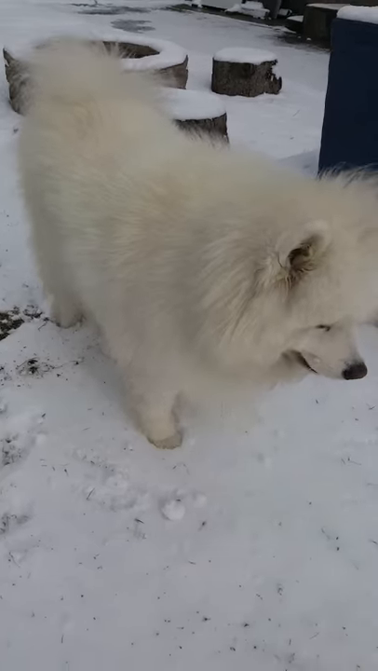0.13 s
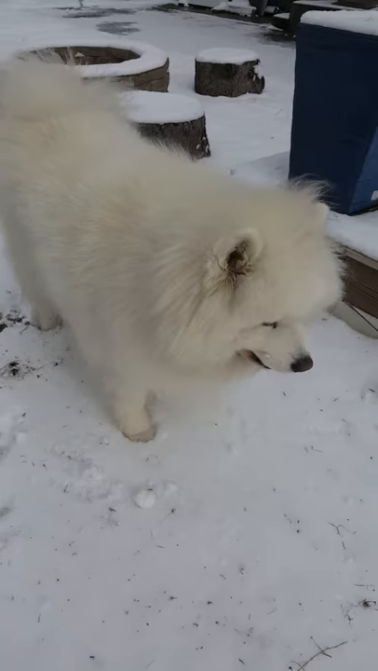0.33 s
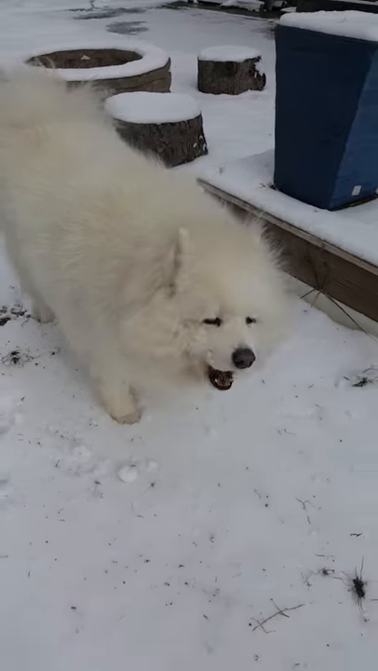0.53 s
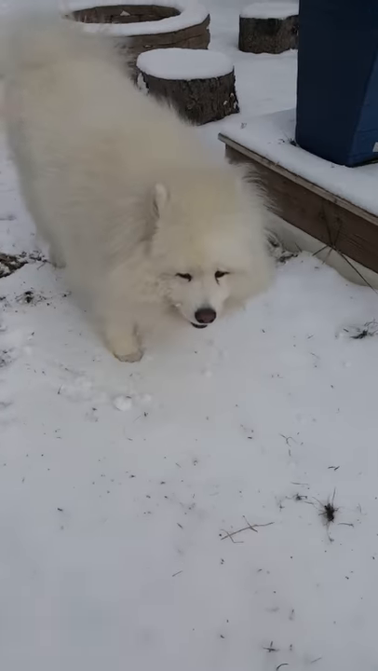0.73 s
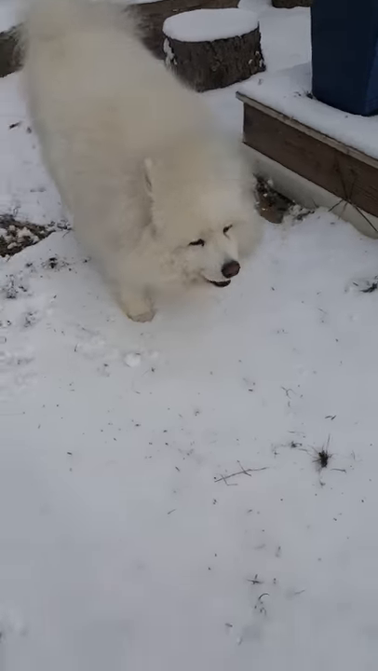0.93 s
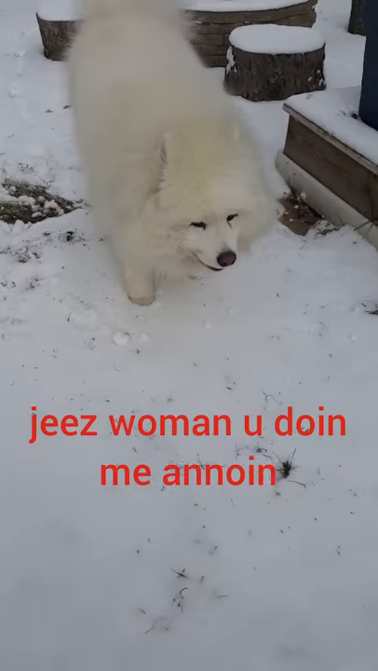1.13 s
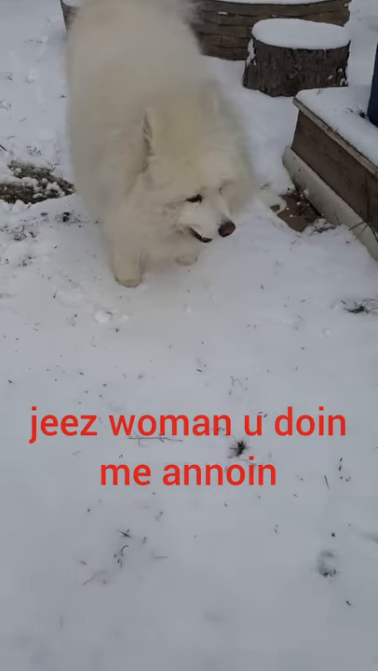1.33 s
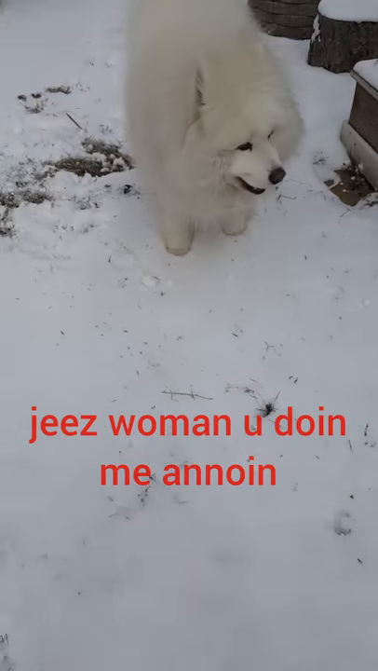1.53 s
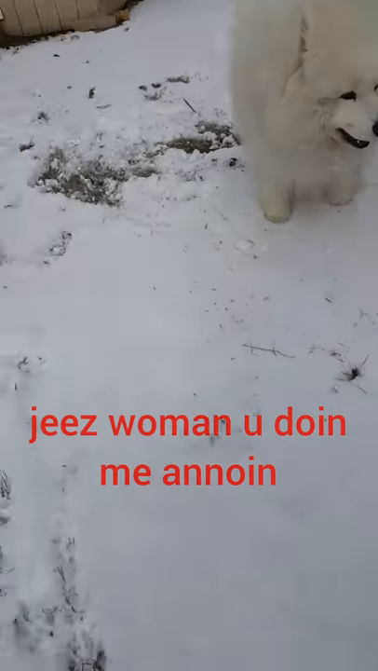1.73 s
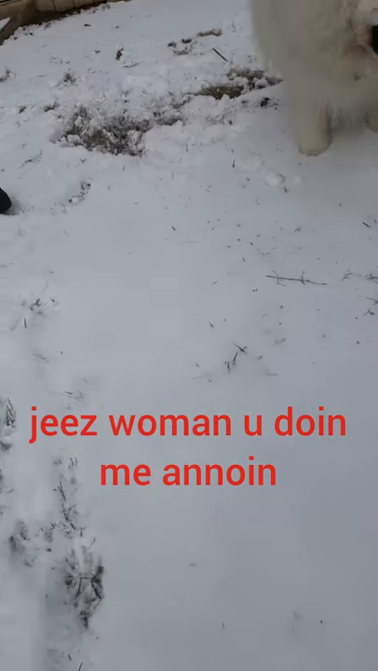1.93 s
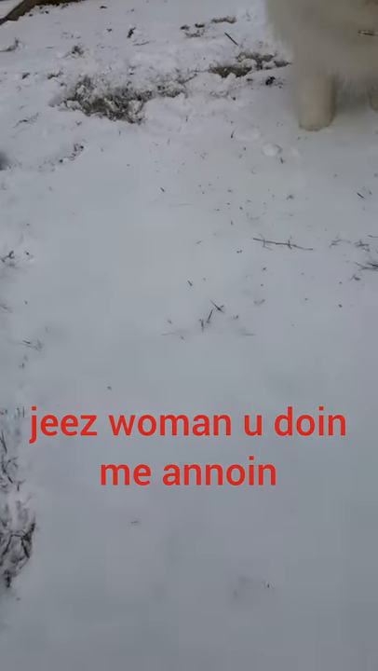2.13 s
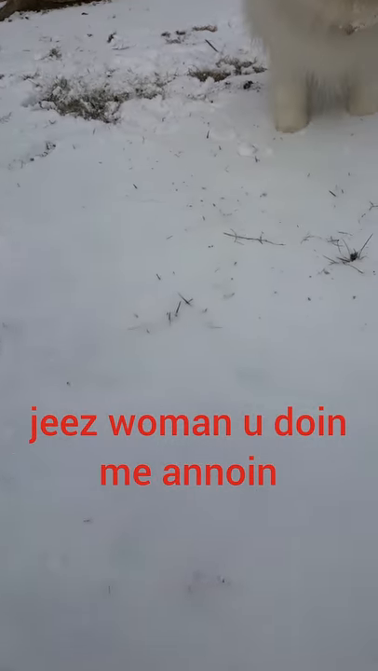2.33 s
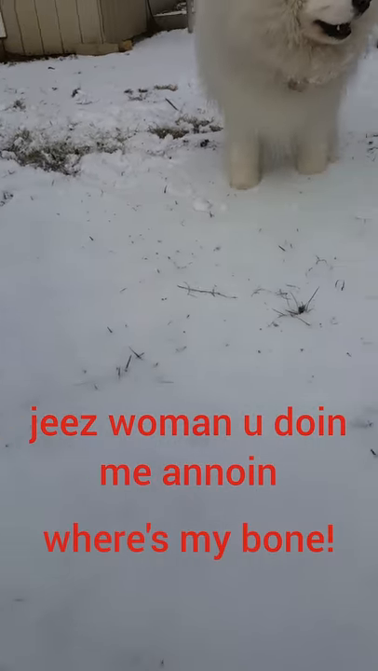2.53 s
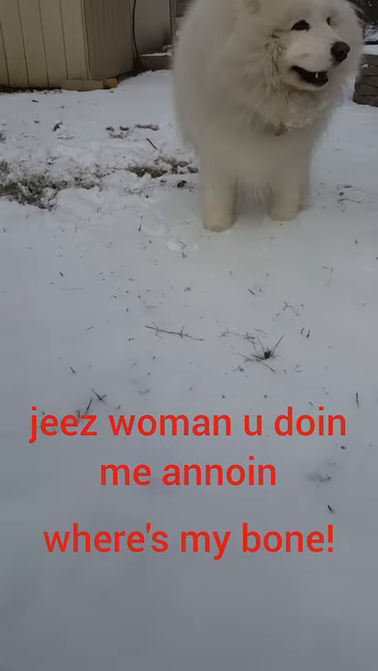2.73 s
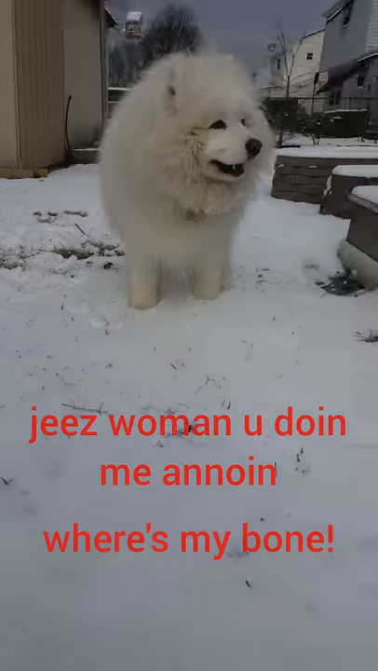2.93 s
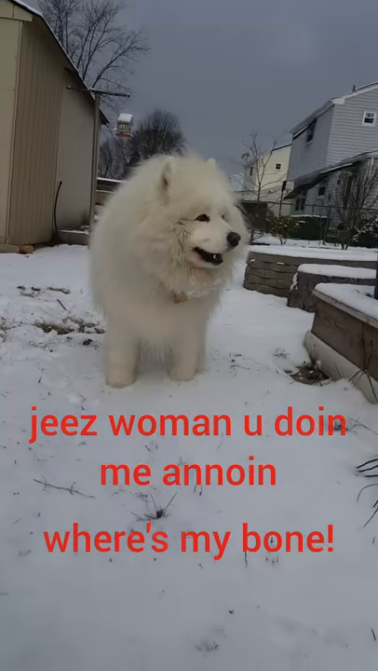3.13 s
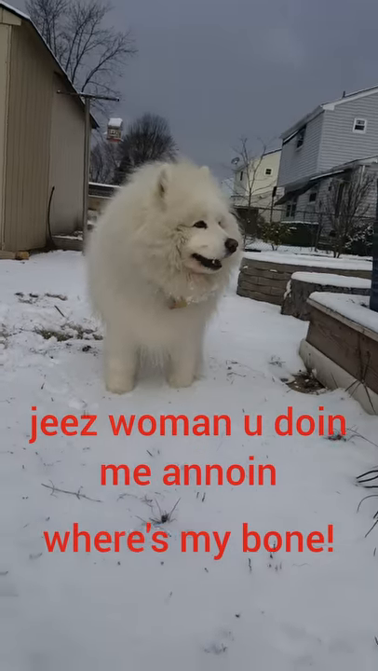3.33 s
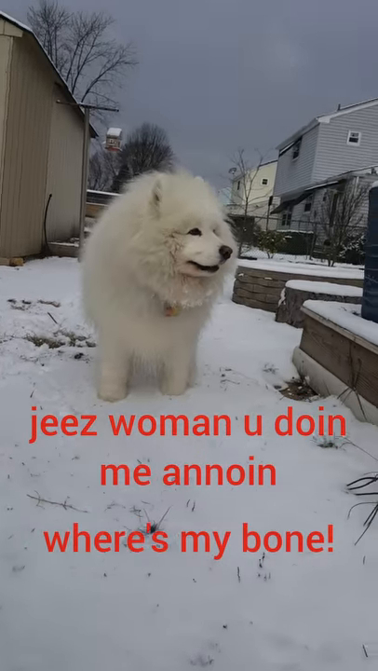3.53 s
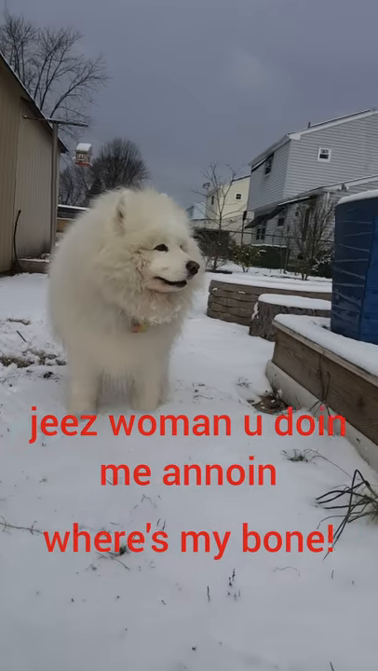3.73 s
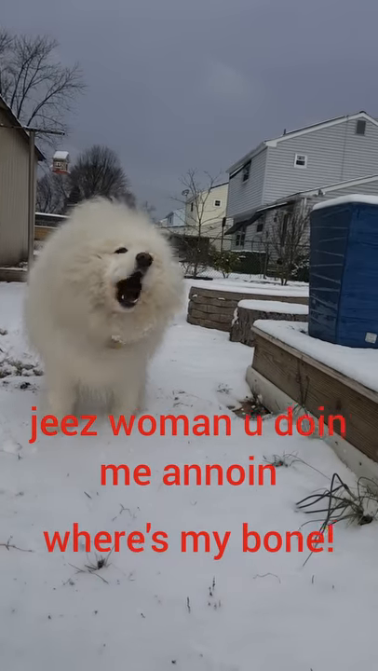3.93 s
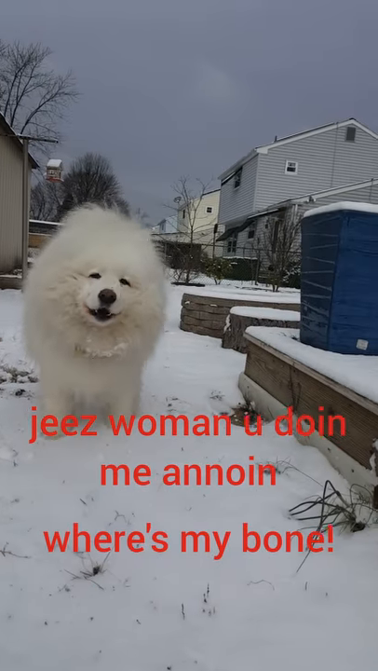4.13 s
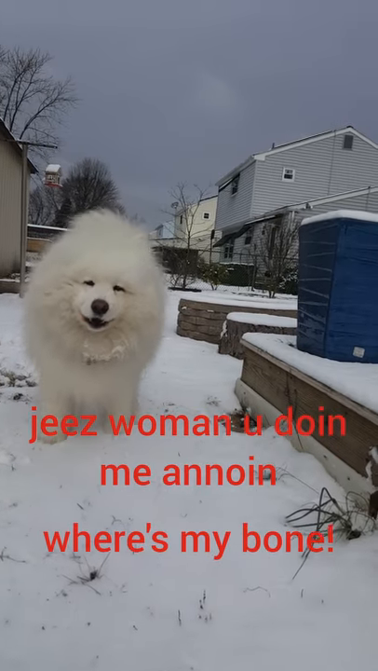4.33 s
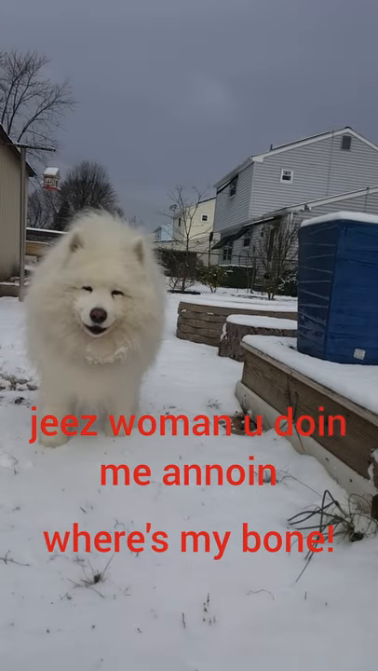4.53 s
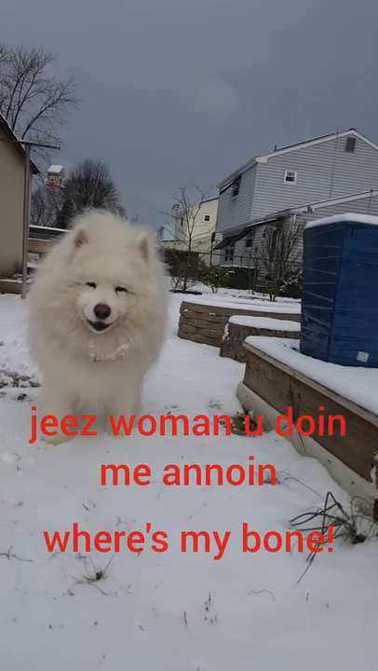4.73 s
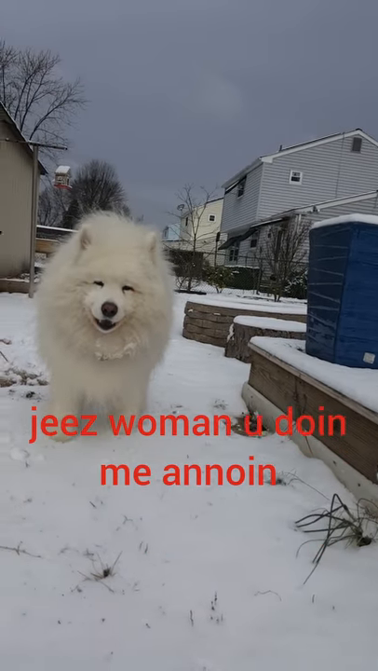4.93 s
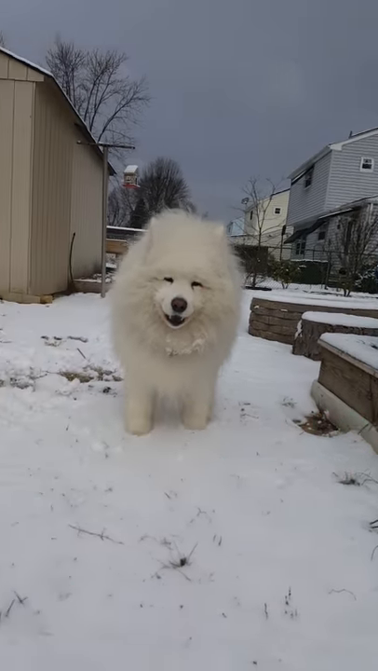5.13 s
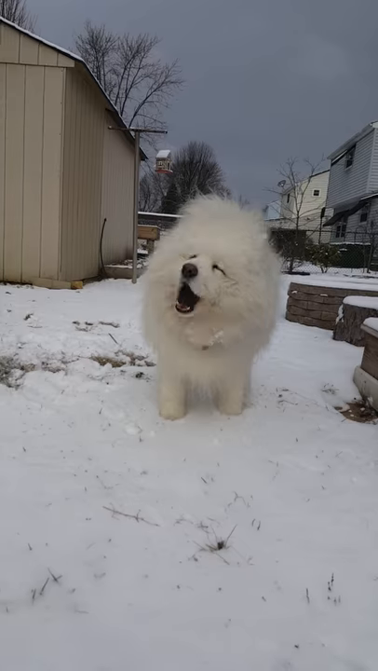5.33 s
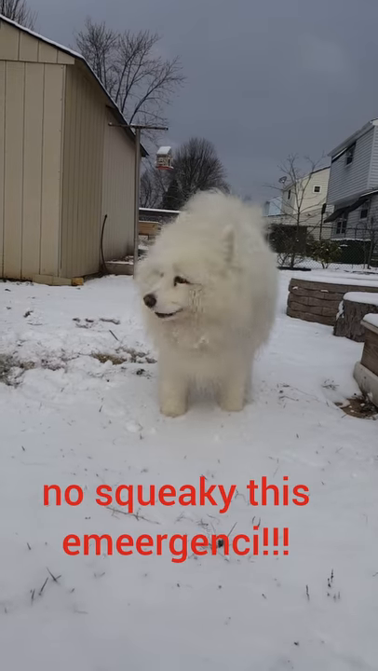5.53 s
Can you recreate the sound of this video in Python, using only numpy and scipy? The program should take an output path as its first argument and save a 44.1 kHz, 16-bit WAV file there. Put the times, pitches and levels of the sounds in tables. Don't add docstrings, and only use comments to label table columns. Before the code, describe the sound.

Five short, yelping barks with a raspy chest tone crack out close to a small stereo microphone, clipping harshly, especially the fourth and fifth. Short echoes come back from sheds and fences. Footsteps crunch in snow and clothes rustle early on; faint grainy ticks follow. Then a run of brief, high, reedy toy squeaks grows louder, continuing around the final bark, over faint distant traffic rumble.

```python
import sys
import numpy as np
from scipy import signal
from scipy.fft import rfft, irfft, next_fast_len
from scipy.io import wavfile
from scipy.ndimage import uniform_filter1d, minimum_filter1d

SR = 44100
rng = np.random.default_rng(int(sys.argv[2]) if len(sys.argv) > 2 else 0)


def how_loud(loudness_db):
    steps = np.asarray(loudness_db, float) / 20
    return 10 ** steps


def waveform_to_disk(signal):
    frames = np.transpose(np.atleast_2d(signal))
    scaled = np.clip(frames, -1, 1) * 32767
    samples = np.round(scaled).astype(np.int16)
    wavfile.write(sys.argv[1], SR, samples)


N = 245637

# t/s, left port leads/rad at three pitches (3 columns), left-right/dB
STANCE = [(.58, -0.17, .2, -1.6, -0.54), (0.951, .1, 1, 1.6, 0.74), (2.051, 0.45, 2.4, 1.4, 1.2),
          (4.029, -0.31, 0.17, 1.4, -0.2), (5.44, -.3, 0.5, 1.3, 1.5)]


def rms_one(x):
    return x / np.sqrt(np.mean(x ** 2) + 1e-20)


def in_time(rows):
    s, *columns = np.transpose(rows)
    return [np.interp(np.arange(N) / SR, s, column) for column in columns]


def per_bark(rows):
    return in_time([(s + shift, *row) for (s, *_), row in zip(STANCE, rows) for shift in (-.12, .12)])


def phrases(tables, fade_s):
    gate = np.zeros(N)
    for rows in tables:
        gate[round(rows[0][0] * SR):round(rows[-1][0] * SR)] = 1
    joined = sorted(sum(map(list, tables), []))
    return [uniform_filter1d(gate, round(fade_s * SR))] + in_time(joined)


def at_hz(points, hz):
    points = np.array(points)
    return np.interp(np.log(hz), np.log(points[:, 0]), points[:, 1])


def drift(rate, at=slice(None)):
    r = np.exp(-32 * np.pi * rate / SR)
    white = rng.standard_normal(N // 16 + 2002)
    slow = signal.lfilter([1], [1, -2 * r, r * r], white)[2000:]
    return np.interp(np.arange(N)[at] / 16, np.arange(len(slow)), rms_one(slow))


def band(x, order, hz, kind):
    return signal.sosfilt(signal.butter(order, hz, kind, fs=SR, output="sos"), x)


def resonance(x, hz, width_hz):
    r = np.exp(-np.pi * width_hz / SR)
    ring = [1, -2 * r * np.cos(2 * np.pi * hz / SR), r * r]
    return signal.lfilter([(1 - r * r) / 2, 0, (r * r - 1) / 2], ring, x + 1e-18)


def barks():
    # t/s, pitch f/Hz, level/dB
    chest_curves = [
        [(0.509, 432, -41.5), (0.515, 468.4, -15), (0.527, 561, -12), (0.537, 671, -7), (0.561, 672.3, -7.5),
         (0.599, 615, -11), (0.607, 609.9, -19.5), (0.62, 622.3, -21.5), (0.631, 650, -34)],
        [(0.874, 369.9, -39.5), (0.888, 542.9, -18), (0.902, 667.5, -4.5), (0.92, 650, -13.5),
         (0.934, 650, -8.5), (0.942, 650, -9), (0.948, 620.5, -18.5), (0.96, 603.7, -17.5),
         (0.998, 640.6, -36.5)],
        [(1.97, 356.8, -46.5), (1.984, 390, -20), (1.997, 567.3, -21), (2.007, 679.5, -5), (2.027, 680.5, -23),
         (2.0305, 662.8, -5), (2.036, 654.4, -18), (2.06, 633.6, -14), (2.095, 606.3, -36.5)],
        [(3.951, 376, -50.5), (3.958, 399.6, -26.5), (3.97, 527.7, -19.5), (3.98, 625.2, -6),
         (3.991, 645.2, -19.5), (4.013, 665.7, -13), (4.019, 768.7, -8.5), (4.04, 626.5, -12),
         (4.071, 592.3, -34)],
        [(5.366, 429.2, -41), (5.37, 462.1, -21.5), (5.382, 522.5, -20.5), (5.398, 655, -3.5),
         (5.408, 665.6, -5.5), (5.419, 656.7, -8), (5.428, 663.3, -16), (5.456, 620.8, -29.5),
         (5.478, 640.6, -31.5)],
    ]
    # t/s, pitch f/Hz, level/dB
    yelp_curves = [
        [(0.538, 880.2, -12), (0.548, 889.8, -11.5), (0.553, 1045, -18), (0.576, 1125, -14), (0.581, 1339, -14),
         (0.599, 1210, -11), (0.604, 1447, -14.5), (0.619, 1396, -13.5), (0.6325, 1170, -19)],
        [(0.905, 1019, -32.5), (0.915, 1026, -15), (0.935, 1074, -11.5), (0.941, 1114, -28),
         (0.951, 1172, -10.5), (0.963, 1250, -21.5), (0.968, 1390, -7.5), (0.985, 1392, -11),
         (1.002, 1091, -33.5)],
        [(2.026, 1016, -26), (2.034, 1054, -23.5), (2.054, 1127, -14.5), (2.078, 1253, -4), (2.083, 1393, -14),
         (2.096, 1363, -9), (2.104, 1250, -23)],
        [(4.027, 1105, -24.5), (4.035, 1109, -9), (4.052, 1120, -7), (4.063, 1095, -7), (4.073, 923, -19.5)],
        [(5.423, 1086, -27.5), (5.429, 1097, -9.5), (5.45, 1124, -10.5), (5.466, 1140, -9), (5.474, 1082, -16),
         (5.48, 978, -18)],
    ]
    # rasp/dB, breath/dB, chest overtones/dB, yelp overtones/dB
    strain = [
        (-11, -45, -4.5, -5.5),
        (-17, -41, -4, -2.5),
        (-19, -34.5, -1, -1),
        (-17.5, -33.5, 2, -2),
        (-23.5, -32, 2, 3),
    ]
    chest_on, chest_hz, chest_db = phrases(chest_curves, fade_s=0.0048)
    yelp_on, yelp_hz, yelp_db = phrases([[*a, *b] for a, b in zip(yelp_curves, jaw_shuts())], fade_s=0.0045)
    chest = 2 * np.pi * np.cumsum(chest_hz * (1 + .015 * drift(150.0))) / SR
    yelp = 2 * np.pi * np.cumsum(yelp_hz * (1 + .006 * drift(150.0))) / SR
    rasp_db, breath_db, chest_edge_db, yelp_edge_db = per_bark(strain)
    voice = two_voices((chest, chest_on, chest_hz, chest_db, chest_edge_db),
                       (yelp, yelp_on, yelp_hz, yelp_db, yelp_edge_db))
    effort = chest_on * how_loud(chest_db) + 0.62 * yelp_on * how_loud(yelp_db)
    effort = uniform_filter1d(effort, round(0.0083 * SR))
    puffs = rng.standard_normal((2, N)) * (1 + 0.58 * np.cos(chest))
    dog = voice + throat_rasp(puffs, effort) * how_loud(rasp_db) + breath(puffs, effort) * how_loud(breath_db)
    pan_db = per_bark([row[1:] for row in STANCE])[-1]
    dog = dog * how_loud(np.array([[.5], [-.5]]) * pan_db)
    return band(dog, 2, 330, "high")


def jaw_shuts():
    # t/s, pitch f/Hz, level/dB, slide/(Hz per s), stretch of the times
    puffs = [
        (.6445, 555.3, -16.5, 6990, 1.1),
        (1.013, 558.9, -15, 8000, .95),
        (2.1125, 660.2, -11, 9990, .75),
        (4.083, 689.7, -6.5, 14020, .8),
        (5.492, 692, -3.5, 12200, .7),
    ]
    # t/s from its middle, level/dB
    shape = [(-.009, -17.5), (-.004, -2.5), (.002, 1), (.008, -9), (.017, -30)]
    return [[(s + d * stretch, hz - slide * d * stretch, db + loss) for d, loss in shape]
            for s, hz, db, slide, stretch in puffs]


def mouth_overtones(level_db, hz, edge_db, orders, opening):
    # f/Hz, level/dB
    wide = [(760, 2), (1000, -10), (1300, -16.5), (1980, -15.5), (2400, -10), (2750, -30), (3400, -25),
            (4200, -38.5), (5500, -55)]
    # f/Hz, level/dB
    narrow = [(730, 3.5), (930, -12), (1200, -2.5), (1500, -14.5), (1950, -12), (2500, -12), (3000, -24),
              (5500, -55)]
    source_db = level_db + edge_db + .035 * np.maximum(620 - hz, 0)
    levels = [level_db]
    for k in orders:
        colour_db = opening * at_hz(wide, k * hz) + (1 - opening) * at_hz(narrow, k * hz)
        narrow_loss_db = 5 * (k > 2) * (1 - opening)
        order_loss_db = 4 * max(k - orders[1], 0)
        levels.append(source_db + colour_db - narrow_loss_db - order_loss_db)
    return levels


def two_voices(chest_voice, yelp_voice):
    # t/s, mouth opening/(0-1), buzz of the folds/dB
    jaw = [(.53, 0, 0), (.541, 1, 0), (.574, .99, 0), (.582, 1, -7), (.61, .99, -9), (.8, 0, 0), (.9, 0, 0),
           (.912, .99, 0), (.945, .99, -2), (.968, 1, -12), (1.9, 0.01, 0), (2.008, 0.02, 0), (2.016, 1, 0),
           (2.075, .99, -1), (2.088, 0.97, -10), (3.8, 0, 0), (3.981, 0.02, -0.5), (3.988, .99, 0),
           (4.035, 1, -2), (4.055, 1, -6), (5.2, 0, 0), (5.391, 0.02, 0), (5.398, .99, 0),
           (5.428, 0.98, -2), (5.44, .99, -8)]
    # chest + yelp/dB, two chest + yelp/dB, chest + two yelp/dB
    coupling = [
        (-13.5, -12, -28.5),
        (-15, -14.5, -27),
        (-17, -18, -19.5),
        (-21.5, -18, -20),
        (-22.5, -21.5, -23),
    ]
    port_hz = [650, 1198, 2385]
    chest, chest_on, chest_hz, chest_db, chest_edge_db = chest_voice
    yelp, yelp_on, yelp_hz, yelp_db, yelp_edge_db = yelp_voice
    opening, buzz_db = in_time(jaw)
    sum_db, upper_db, top_db = per_bark(coupling)
    *leads, _ = per_bark([row[1:] for row in STANCE])
    voiced = np.flatnonzero(chest_on + yelp_on > 1e-6)
    voice = np.zeros((2, N))

    def add(turn, hz, size, flutter_db):
        step = np.interp(hz[voiced], port_hz, range(3))
        lead = sum(np.maximum(1 - abs(step - k), 0) * gap[voiced] for k, gap in enumerate(leads))
        flutter = how_loud(flutter_db * np.array([drift(110.0, voiced), drift(110.0, voiced)]))
        wave = np.sin(turn[voiced] + np.array([[.5], [-.5]]) * lead)
        voice[:, voiced] += np.sqrt(2) * size[voiced] * flutter * wave

    yelp_edge_db = yelp_edge_db - 0.1 * np.maximum(940 - yelp_hz, 0)
    chest_levels = mouth_overtones(chest_db, chest_hz, chest_edge_db + buzz_db, range(2, 9), opening)
    yelp_levels = mouth_overtones(yelp_db, yelp_hz, yelp_edge_db, range(2, 5), opening)
    for k, db in enumerate(chest_levels, 1):
        add(k * chest, k * chest_hz, chest_on * how_loud(db), flutter_db=min(.7 + 1.8 * (k - 1), 4.5))
    for k, db in enumerate(yelp_levels, 1):
        add(k * yelp, k * yelp_hz, yelp_on * how_loud(db), flutter_db=.7 + 1.0 * (k - 1))
    both = chest_on * yelp_on * how_loud((chest_db + yelp_db) / 2 + buzz_db)
    for a, b, db, flutter_db in ((1, 1, sum_db, 3.5), (2, 1, upper_db, 3.0), (1, 2, top_db, 2.5), (-2, 2, -19.0, -4.0)):
        add(a * chest + b * yelp, a * chest_hz + b * yelp_hz, both * how_loud(db), flutter_db)
    return voice


def throat_rasp(puffs, effort):
    # f/Hz, width/Hz, level/dB
    throat = [(699, 140, 1), (1250, 310, 0), (1750, 210, -10.5), (2500, 310, -6.5), (3140, 760, -25)]
    # t/s, effort/dB
    huff = [(1.3, -73), (1.36, -32.5), (1.418, -41.5), (1.444, -77)]
    rasp = sum(how_loud(db) * resonance(puffs, hz, width) * (-1) ** k / np.sqrt(width)
               for k, (hz, width, db) in enumerate(throat))
    rasp = band(rasp, 4, 380, "high")
    pant = how_loud(in_time([(0, -120), *huff, (N / SR, -120)])[0])
    return (effort + pant) * rms_one(rasp)


def breath(puffs, effort):
    # f/Hz, width/Hz, level/dB
    airway = [(3990, 500, -1), (4930, 400, -3.5), (6500, 980, -1), (8190, 750, -0.5), (10476, 3200, -8),
              (13610, 2500, -9)]
    flow = uniform_filter1d(np.sqrt(np.abs(effort)), round(0.019 * SR))
    flow = np.roll(flow, round(0.0029 * SR))
    linger = np.exp(-1 / (0.0068 * SR))
    flow = signal.lfilter([1 - linger], [1, -linger], flow) * how_loud(2.1 * drift(60.0))
    air = sum(how_loud(db + 4.9 * drift(30.0)) * resonance(puffs, hz, width) * np.sqrt(5000 / width) * (-1) ** k
              for k, (hz, width, db) in enumerate(airway))
    return flow * band(air, 2, 3300, "high")


def throat_catch():
    # t/s, peak level/dB, ring f/Hz, left-right/dB
    gulp = [
        (5.33, -29.5, 740, 0),
    ]
    return crunches(gulp, cycles=7.5, crack_db=-50, broad_db=-50)


def squeeze_shape():
    # t/s, length/s, level/dB, top pitch f/Hz, last pitch f/Hz
    squeezes = [(4.347, 0.034, -44, 1222, 1140), (4.473, .025, -42.5, 1296, 1140),
                (4.61, .078, -41, 1207, 1134), (4.753, .043, -41, 1241, 1089),
                (4.872, .061, -28, 1250, 1111), (5.005, 0.036, -28, 1300, 1089),
                (5.197, .092, -23.5, 1267, 1119), (5.368, .028, -39, 1331, 1291),
                (5.456, 0.065, -40.5, 1344, 1340), (5.517, 0.017, -38, 1539, 1350),
                (5.534, 0.0304, -39, 1290, 1130)]
    # share of the time spent swelling, first pitch f/Hz, droop bend, leaking air/dB
    grip = [(.25, 1212, 2.1, 7), (.3, 1290, 2.1, 4), (.3, 1195, 2.1, 2), (.06, 1240, 1.2, 5.5),
            (.56, 1210, 1.6, 1.5), (.35, 1293, 2.3, 3), (.49, 1208, 1.5, 0), (.3, 1325, 1.9, 0),
            (0.63, 1335, 1.9, -3), (.5, 1360, 1.3, -4), (0.075, 1290, 1.16, -2)]
    t = np.arange(N) / SR
    on, level_db, hz = np.zeros(N), np.full(N, -120.), np.full(N, 1250.)
    droop_hz, haste, air_db = np.zeros((3, N))
    for (s, length, db, top_hz, last_hz), (share, first_hz, bend, leak_db) in zip(squeezes, grip):
        now = slice(round((s - .001) * SR), round((s + length + .002) * SR))
        on[round(s * SR):round((s + length) * SR)] = 1
        swell_s = length * np.clip(share, .05, .9)
        early = np.clip((s + swell_s - t[now]) / swell_s, 0, 1)
        late = np.maximum(t[now] - s - swell_s, 0) / (length - swell_s)
        level_db[now] = db - 11 * share * early ** 2 - 7.5 * late ** 2
        haste[now] = min(0.044 / length, 1.3)
        air_db[now] = leak_db
        droop_hz[now] = (top_hz - last_hz) * late ** bend
        stall_hz = 55 * np.minimum(late, 1.05) ** 9 * (top_hz - last_hz > 30)
        hz[now] = top_hz - (top_hz - first_hz) * early - droop_hz[now] - stall_hz
    on = uniform_filter1d(on, round(.0025 * SR))
    hz = uniform_filter1d(hz, round(.004 * SR), mode="nearest")
    return on, level_db, hz, droop_hz, haste, air_db


def toy():
    # right level/dB, left-right/dB, left leads/rad
    reed = [(-13.5, -3, 4), (-7.5, -5.5, .5), (-10.5, -6, -2.5), (-12, -11, -0.1), (-6, -14, 7.5),
            (-11, -9, -0.75), (-2, -13, -6), (-7.5, -2.5, -11), (-15, -12, -1.5), (-22, -6, -5.5),
            (-21, -18, 2.5), (-27.5, -12, -6)]
    # f/Hz, level/dB
    rubber = [(1000, 0), (3700, 1), (5200, 0), (6500, -6), (7400, -0.5), (8500, 1), (9400, 5), (10800, -3),
              (13000, 1), (16000, -3.5)]
    on, level_db, hz, droop_hz, haste, air_db = squeeze_shape()
    turn = 2 * np.pi * np.cumsum(hz * (1 + .0025 * drift(140.0))) / SR
    blown = np.flatnonzero(on > 1e-6)
    tone, pitch = np.zeros((2, N)), hz[blown]
    belly_db = 10.5 * np.exp(-((pitch - 1320) / 41) ** 2)
    for k, (db, pan_db, lead) in enumerate(reed, 1):
        grit_db = .14 * k * drift(400.0, blown) + 3.2 * drift(40.0, blown)
        fail_db = 0.025 * max(k - 2, 0) * (droop_hz * haste)[blown]
        body_db = at_hz(rubber, k * pitch) + (k == 1) * belly_db
        sides_db = np.array([pan_db + 2.3 * drift(4.5, blown), 0 * pitch])
        wave = np.sin(k * turn[blown] + .5 * k + np.array([[lead], [0]]))
        tone[:, blown] += how_loud(db + grit_db - fail_db + body_db + sides_db) * wave
    tone *= how_loud(7.0) * on * how_loud(level_db)
    return tone + toy_leak(on, turn, level_db + air_db, droop_hz)


def toy_leak(on, turn, level_db, droop_hz):
    # f/Hz, width/Hz, level/dB
    hollow = [(5030, 1800, -5), (9500, 1900, 0), (13200, 2600, -4)]
    hiss = rng.standard_normal((2, N)) * (1 + 0.69 * on * np.cos(turn))
    hiss = sum(how_loud(db) * resonance(hiss, hz, width) * (-1) ** k for k, (hz, width, db) in enumerate(hollow))
    hiss = how_loud(6.0) * band(hiss, 2, 3300, "high")
    span = round(0.006 * SR)
    drooping = on * how_loud(level_db + 0.0929 * np.minimum(droop_hz, 110))
    held = np.roll(-minimum_filter1d(-drooping, span), span // 2)
    held = held * how_loud(-3.0) + on * how_loud(level_db - 12)
    fading = np.exp(-1 / (0.004 * SR))
    return hiss * signal.lfilter([1 - fading], [1, -fading], held) * how_loud([[-22], [-16]])


def yard_echo(x):
    # f/Hz, time to fall 60 dB t/s
    t60_s = [(300, .3), (650, .4), (1200, 0.54), (2400, 0.46), (5000, 0.35), (12000, .25)]
    # f/Hz, level/dB
    walls = [(400, 0), (650, 1), (900, 0), (1150, 1.5), (1400, -6.5), (1700, 3), (2400, 1.5), (5000, 0)]
    size = next_fast_len(N + SR)
    hz = np.arange(size // 2 + 1) * SR / size
    t60 = at_hz(t60_s, hz + 1)
    combs = []
    for lag in rng.uniform(0.024, 0.067, (2, 10)):
        loops = 10 ** (-3 * lag[:, None] / t60) * np.exp(-2j * np.pi * hz * lag[:, None])
        combs.append((loops / (1 - loops)).sum(axis=0))
    slap = how_loud(4) * np.exp(-((hz - 1200) / 260) ** 2)
    slap = slap * np.exp(-2j * np.pi * hz * .041 * np.array([[1], [1.01]]))
    apart = np.clip(hz / 2200, .1, 1)
    mid, side = combs[0] * np.sqrt(2 - apart), combs[1] * np.sqrt(apart)
    room = np.array([mid + side, mid - side]) / 3 + slap
    return irfft(rfft(x, size) * how_loud(at_hz(walls, hz + 1)) * room, size)[:, :N]


def crunches(events, cycles, crack_db, broad_db):
    t = np.arange(round(0.0099 * SR)) / SR
    out = np.zeros((2, N))
    for s, db, hz, pan_db in events:
        ring = np.sin(2 * np.pi * hz * t) * np.exp(-t * hz / cycles)
        burst = rng.standard_normal((2, len(t))) * np.exp(-t / 0.0013) * np.minimum(t / .0004, 1)
        crack = how_loud(crack_db) * resonance(burst, hz, 0.63 * hz)
        crack += how_loud(broad_db) * signal.lfilter([.5], [1, -.5], burst)
        at = round(s * SR)
        out[:, at:at + len(t)] += how_loud(db) * (ring + crack) * how_loud([[pan_db / 2], [-pan_db / 2]])
    return out


def snow_and_grip():
    # t/s, peak level/dB, ring f/Hz, left-right/dB
    steps = [(0.013, -33, 268, 2), (0.03, -31, 1010, 3.5), (0.038, -40.5, 470, 23), (0.074, -33, 466, 1),
             (0.137, -32, 960, -21), (0.143, -30, 1890, 27.5), (0.407, -18.5, 427, -5.5),
             (0.469, -32, 368, -2), (1.196, -45, 400, -9), (1.222, -45, 276, -3), (1.57, -35.5, 298, -4),
             (1.679, -41.5, 254, -2), (1.693, -36.5, 444, -6), (1.704, -39.5, 253, -8),
             (1.723, -36.5, 434, 8), (1.753, -47.5, 1290, -37.5)]
    # t/s, peak level/dB, ring f/Hz, left-right/dB
    ticks = [(2.7223, -71, 1800, -7), (2.7223, -58, 4210, -7.0), (2.7482, -58.5, 2110, -2.0),
             (2.7566, -52.5, 2210, -6.5), (2.7881, -47.5, 1980, -7), (2.8156, -58, 2070, -1.5),
             (2.8375, -55.5, 2020, -0.5), (2.8874, -50.5, 2950, -4.5), (2.8935, -52, 6300, -5),
             (2.9052, -50, 3100, -5), (2.936, -54, 3300, -4), (3.0045, -53, 3000, -6),
             (3.0232, -39, 6000, -7), (3.0402, -48, 4500, -7), (3.0515, -49, 9500, -5),
             (2.9313, -53, 2970, -5), (2.9482, -33, 2190, 5), (2.9802, -53, 2350, -7),
             (2.9912, -41, 2480, -9), (3.0116, -36, 2320, -7), (3.0256, -37, 2770, -12),
             (3.0725, -35.5, 2670, -8), (3.0899, -38, 12700, -5), (3.1686, -54.5, 2340, -7),
             (3.2456, -53, 2500, -4), (3.4396, -62, 1810, -2), (3.495, -54, 2600, -5),
             (3.6058, -43, 8290, -4.5), (3.7599, -55, 2100, -5), (3.8108, -48.5, 9050, -7),
             (3.9083, -54, 2130, -5), (3.93, -43, 2170, -5)]
    dull = crunches(steps, cycles=0.94, crack_db=-18.0, broad_db=-21.5)
    return dull + crunches(ticks, cycles=1.26, crack_db=5.5, broad_db=-6.0)


def shuffles():
    # t/s, half length/s, level/dB, f/Hz
    thuds = [
        (0.545, .03, -44, 200),
        (0.738, 0.036, -54, 228),
        (1.115, 0.04, -54.5, 240),
        (1.401, 0.027, -64, 202),
        (2.186, .03, -57.5, 404),
        (2.42, 0.073, -76.5, 3450),
        (1.377, 0.051, -61.5, 2280),
        (1.391, 0.039, -53.5, 700),
    ]
    t, out = np.arange(N) / SR, np.zeros((2, N))
    for s, half, db, hz in thuds:
        now = slice(round((s - .15) * SR), round((s + .15) * SR))
        noise = resonance(rng.standard_normal((2, now.stop - now.start)), hz, 140)
        swell = np.exp(-((t[now] - s) / half) ** 2)
        out[:, now] += how_loud(db) * swell * rms_one(resonance(noise, hz, 140))
    return out


def banded_noise(spectrum, patchy_db):
    # f/Hz, likeness/(0-1)
    likeness = [(40, 1), (140, 0.19), (600, 0.82), (1200, 0.26), (2500, 0.0039), (6000, 0)]
    out, white = 0, rng.standard_normal((2, 2, N))
    bottom, top = spectrum[0][0], spectrum[-1][0]
    edges = np.geomspace(bottom, top, round(2 * np.log2(top / bottom)) + 1)
    for k, (low, high) in enumerate(zip(edges, edges[1:])):
        centre = np.sqrt(low * high)
        mid, side = band(white[k % 2], 2, [low, high], "band")
        alike = np.clip(at_hz(likeness, centre), 0, 1)
        gain = how_loud(at_hz(spectrum, centre) + patchy_db * drift(25.0))
        out = out + gain * (np.sqrt(1 + alike) * mid + np.sqrt(1 - alike) * side * [[1], [-1]])
    return rms_one(out)


def background():
    # f/Hz, level/dB
    rumble_bands, yard_bands, hiss_bands = [(12, -48.5), (20, -19.5), (57, -1.5), (112, 1.5), (136, -5.5),
                                            (152, -6.5), (172, -11), (300, -16), (390, -48.5), (660, -120)], [(130, -33.5), (220, -5), (319, -14),
                                                            (446, -7.5), (751, -2), (1030, -8.5),
                                                            (1180, -6.5), (2230, -16.5), (2560, -18),
                                                            (3500, -30.5), (4550, -59), (7700, -120)], [(1650, -30.5), (2800, -3),
                                                                          (6050, -8.5), (7160, -7),
                                                                          (8860, -8), (12800, -13),
                                                                          (16200, -9)]
    duck_rumble = [1.01, 1.01, 1.01, .65, .8]
    # t/s, half length/s, yard lift/dB, hiss lift/dB
    rustles = [
        (0.0, .06, 7.5, 18),
        (0.128, 0.099, 10.5, 6),
        (0.43, .12, 8.5, 0),
        (1.89, 0.23, 5.5, 10.5),
        (3.939, 0.081, 2.5, 4.5),
        (5.04, 0.0562, 7, 10.5),
        (5.326, 0.065, 10.5, 9),
    ]
    t = np.arange(N) / SR
    starts = np.array(STANCE)[:, 0] - .05
    since = np.array([np.where(t > s, t - s, 99) for s in starts]).min(axis=0)
    duck_db = 16 * np.clip(1 - (since - .68) / 0.39, 0, 1)
    share = np.array(duck_rumble)[np.clip(np.searchsorted(starts, t) - 1, 0, None)]
    yard_lift_db, hiss_lift_db = sum(np.exp(-((t - s) / half) ** 2) * np.array([[yard], [hiss]])
                                     for s, half, yard, hiss in rustles)
    hum_hz = 145.3
    hum = resonance(resonance(rng.standard_normal(N), hum_hz, 13), hum_hz, 13)
    hum = how_loud(-5.5 - .35 * duck_db) * rms_one(hum)
    rumble = how_loud(-51.5 - duck_db * share) * (banded_noise(rumble_bands, patchy_db=-1.0) + hum)
    air = banded_noise(yard_bands, patchy_db=.9)
    yard = how_loud(-56.5 - 0.67 * duck_db + yard_lift_db) * air
    far_tail = how_loud(-34) * np.exp(-since / 0.092) * band(air, 2, [560, 3000], "band")
    hiss_db = -68 - 0.99 * duck_db + hiss_lift_db + np.array([[-2.5], [2.5]])
    return rumble + yard + far_tail + how_loud(hiss_db) * banded_noise(hiss_bands, patchy_db=2.5)


def scene():
    dog, squeaks = barks(), toy()
    echo = yard_echo(dog[0] * how_loud(-23) + squeaks[1] * how_loud(-33.5))
    return dog + throat_catch() + squeaks + echo + snow_and_grip() + shuffles() + background()


def converter_overload(dry):
    overloads = [(.9305, .9322, 1.06, 0, .85), (2.0125, 2.016, 1.14, 1.14, .55),
                 (2.021, 2.026, 1.15, 0, .2), (2.0282, 2.0295, 0, 1.06, .8), (3.984, 3.99, 1.7, 1.2, .45),
                 (3.9905, 4.0, 1.9, 0, .3), (4.002, 4.018, 1.8, 1.6, .68), (4.021, 4.034, 1.3, 1.45, .72),
                 (4.035, 4.051, 0, 1.04, .72), (5.395, 5.4015, 1.35, 1.06, .75),
                 (5.4065, 5.409, 1.2, 1.2, .75), (5.415, 5.427, 1.25, 1.35, .85),
                 (5.428, 5.446, 1.35, 0, .5)]
    core = signal.sosfiltfilt(signal.butter(2, 1500, fs=SR, output="sos"), dry)
    peak = -minimum_filter1d(-np.abs(core), round(.003 * SR))
    peak = uniform_filter1d(peak, round(.002 * SR)) + 1e-9
    out = 1.5 * np.tanh(dry / 1.5)
    surge = how_loud(0.88 * drift(160.0))
    for start, end, left, right, full in overloads:
        span = slice(round((start - .001) * SR), round((end + .001) * SR))
        swell = signal.windows.tukey(span.stop - span.start, .002 / (end - start + .002))
        for ch, share in enumerate((left, right)):
            if share > .5:
                shape = (.7 + .3 * swell) * surge[span] * core[ch, span] / peak[ch, span]
                driven = share * shape / np.abs(shape).max()
                wrapped = full * np.tanh(1.6 * ((driven + 1) % 2 - 1))
                wrapped -= 0.45 * uniform_filter1d(wrapped, round(0.0027 * SR))
                out[ch, span] += (wrapped - out[ch, span]) * np.minimum(3 * swell, 1)
    return out


def top_cut(x):
    return signal.sosfilt(signal.butter(12, 16320, fs=SR, output="sos"), x)


def record(dry):
    out = converter_overload(dry)
    out = signal.sosfilt(signal.cheby2(10, 40, 16300, fs=SR, output="sos"), out)
    return top_cut(np.clip(out, -1, 1))


dry = scene()
out = record(dry)
waveform_to_disk(out)
```